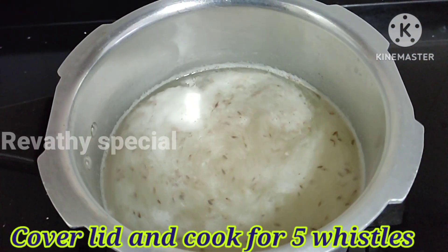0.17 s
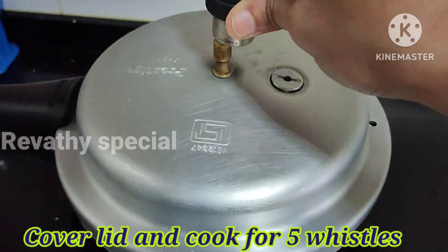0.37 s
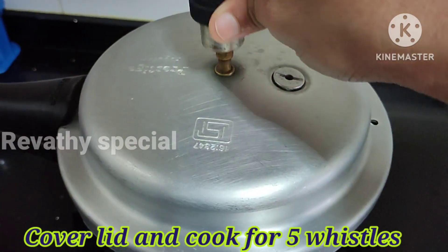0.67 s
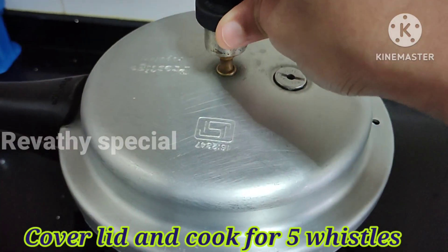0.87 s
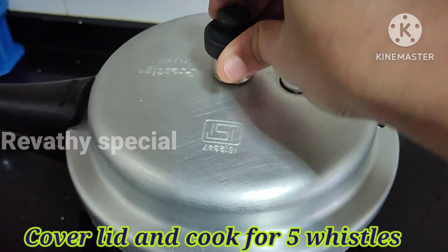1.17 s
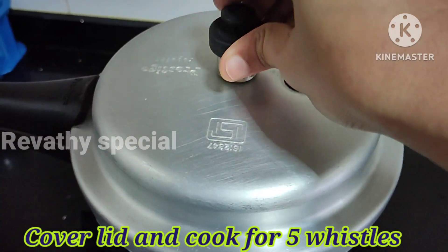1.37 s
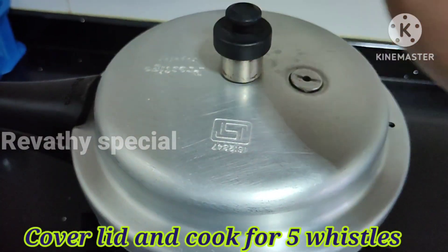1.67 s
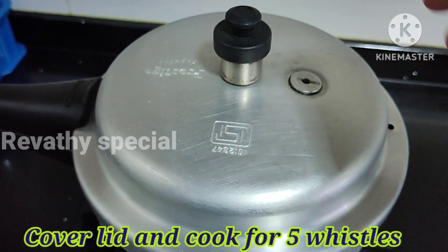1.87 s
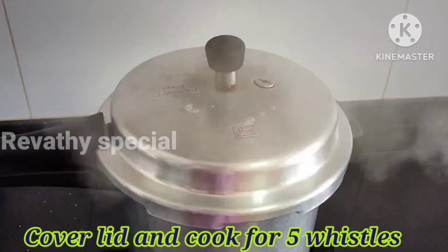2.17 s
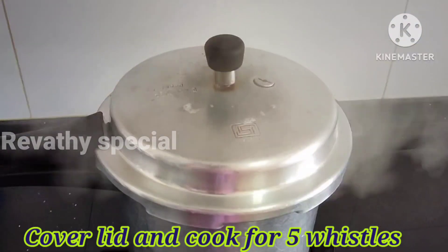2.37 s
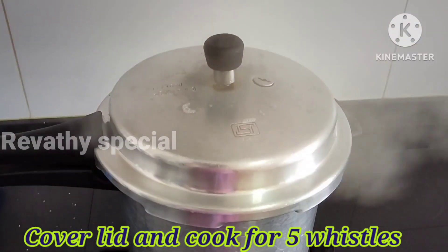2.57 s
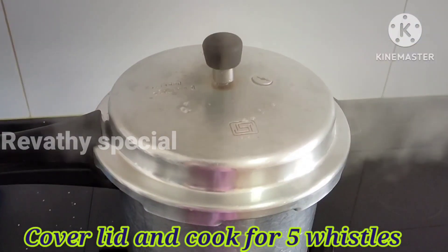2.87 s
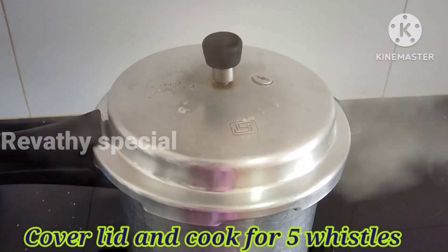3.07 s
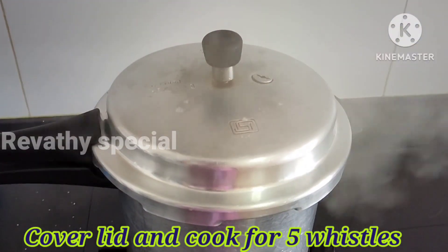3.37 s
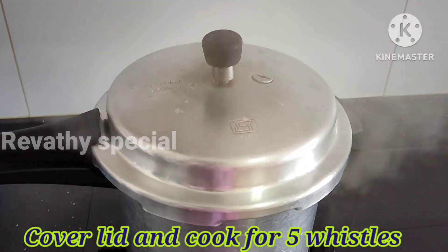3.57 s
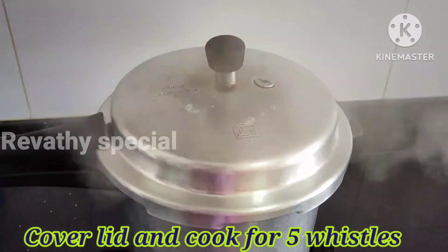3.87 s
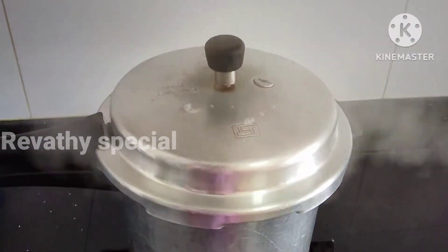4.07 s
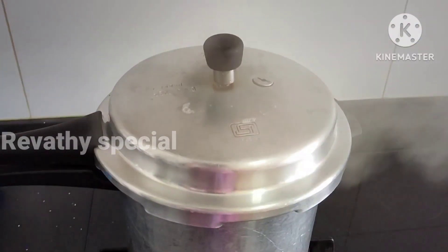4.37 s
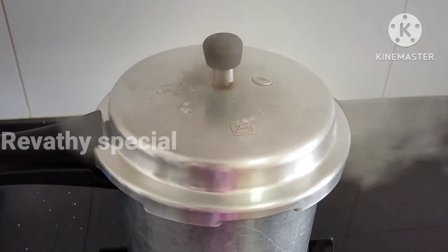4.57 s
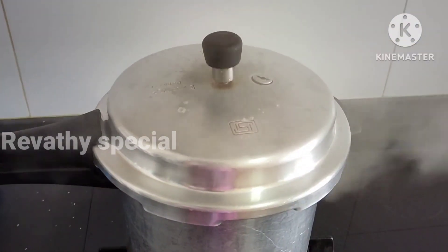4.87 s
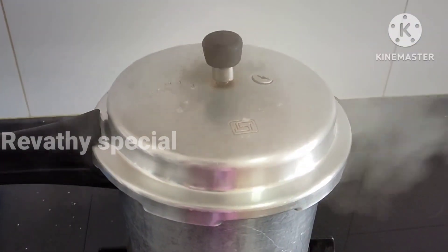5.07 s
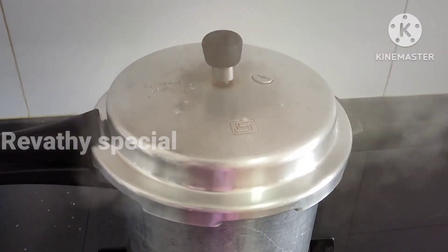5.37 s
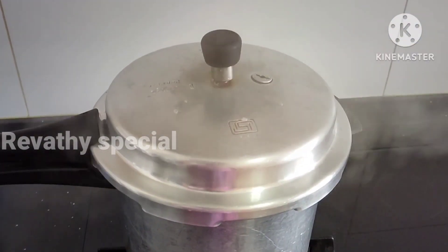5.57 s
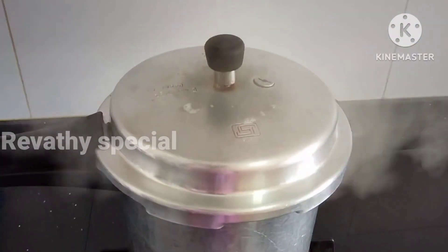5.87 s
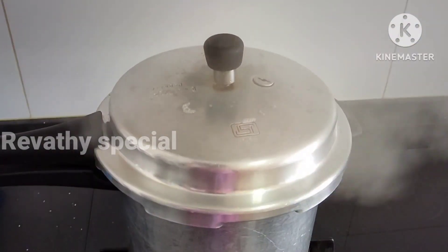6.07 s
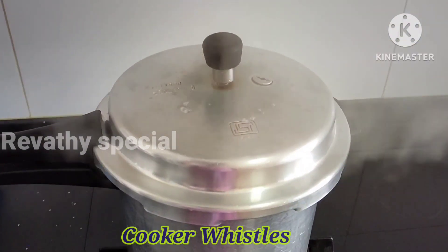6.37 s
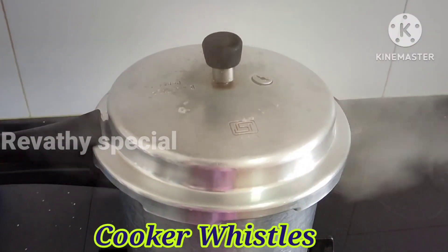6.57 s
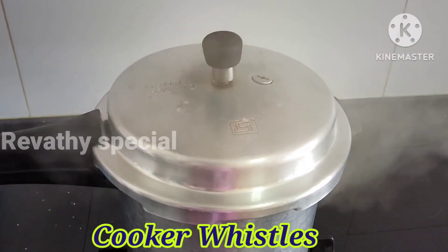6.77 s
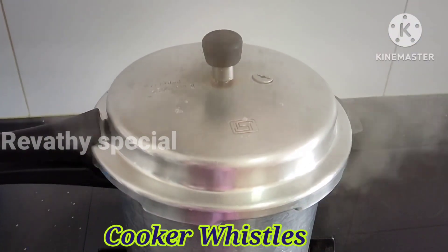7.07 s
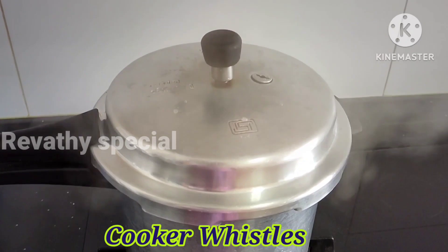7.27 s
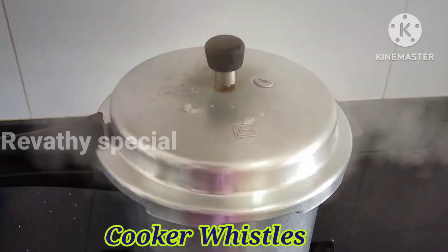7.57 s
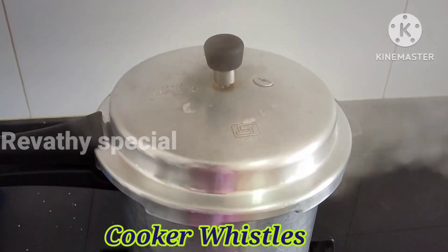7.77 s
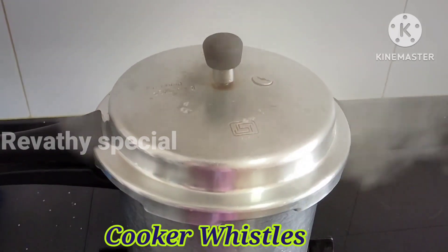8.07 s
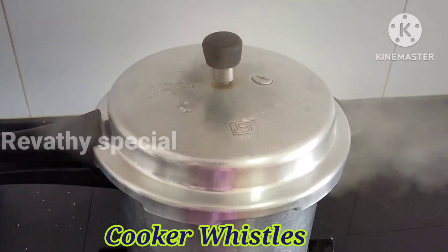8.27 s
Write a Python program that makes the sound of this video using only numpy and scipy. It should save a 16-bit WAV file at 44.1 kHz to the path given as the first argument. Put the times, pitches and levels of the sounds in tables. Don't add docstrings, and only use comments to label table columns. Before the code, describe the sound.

A faint metallic pot ring fades, a metal weight ticks, scrapes and snaps onto a lid, then roaring steam hisses in four repeated bursts.

```python
import sys
import numpy as np
from scipy import signal
from scipy.fft import irfft
from scipy.io import wavfile
from scipy.ndimage import uniform_filter1d

SR = 44100
rng = np.random.default_rng(int(sys.argv[2]) if len(sys.argv) > 2 else 0)


def store_pcm(level_fs):
    pcm = np.round(np.clip(level_fs, -1, 1) * 32767).astype(np.int16)
    wavfile.write(sys.argv[1], SR, np.atleast_2d(pcm).T)


def voltage_ratio(level):
    return 10 ** (np.asarray(level, float) / 20)


N = 371322

# frequency_hz, left_right_db
AIR_BALANCE = [(60, 2.5), (400, 2), (1200, 2.5), (2600, 13), (4000, 7), (5500, 13.5), (7200, 22.5),
               (8500, 5), (9500, -13.5), (14000, -2.5)]


def evened(x):
    return x / np.sqrt(np.mean(x ** 2) + 1e-20)


def read(points, hz):
    f, value = np.transpose(points)
    return np.interp(np.log(hz + 1), np.log(f + 1), value)


def ports(balance, hz):
    ratio = voltage_ratio(read(balance, hz)) ** 2
    return np.sqrt(2 * np.array([ratio, np.ones_like(ratio)]) / (1 + ratio))


def band(x, lo_hz, hi_hz):
    return signal.sosfilt(signal.butter(2, [lo_hz, hi_hz], "band", fs=SR, output="sos"), x)


def hiss(field_db, same, balance, size):
    hz = np.fft.rfftfreq(size, 1 / SR)
    a, b, c, d = rng.standard_normal(field_db.shape[::-1] + (4,)).T
    same = np.clip(same, -1, 1)[:, None]
    left = a + 1j * b
    early = np.exp(2j * np.pi * hz * 5 / SR)[:, None]
    right = same * left * early + np.sqrt(1 - same ** 2) * (c + 1j * d)
    z = np.array([left, right]) * voltage_ratio(field_db) * ports(balance, hz)[:, :, None]
    return signal.istft(z, nperseg=size, noverlap=size * 3 // 4)[1]


def kitchen(x, gap_s=0.0067):
    # frequency_hz, t60_s
    room_decay = [(200, 0.88), (1000, 0.64), (3000, 0.545), (8000, 0.71), (14000, .35)]
    echoes = np.zeros((2, SR))
    at = np.arange(200, SR - 20, 20) + rng.integers(0, 20, (2, (SR - 201) // 20))
    np.put_along_axis(echoes, at, rng.choice([-1., 1.], at.shape), 1)
    hz, t, z = signal.stft(echoes, SR, nperseg=256)
    z *= voltage_ratio(-60 * t / read(room_decay, hz)[:, None]) * (1 - np.exp(-t / gap_s))
    tail = signal.istft(z, SR, nperseg=256)[1]
    return signal.fftconvolve(x, tail / np.linalg.norm(tail[0]), axes=1)[:, :x.shape[1]]


def thinned(x, shares, depth_db=-50, edge_hz=15480):
    mid_side = np.array([x[0] + x[1], x[0] - x[1]]) / 2
    hz, t, z = signal.stft(mid_side, SR, "cosine", nperseg=2048, noverlap=1536)
    luck = rng.standard_normal((len(t) // 2 + 1, len(hz) // 10 + 1, 2))
    luck = uniform_filter1d(luck, size=2, axis=0)
    rank = np.array([v.ravel().argsort().argsort().reshape(v.shape) / v.size for v in luck.T])
    rank = rank.repeat(10, axis=1).repeat(2, axis=2)[:, :len(hz), :len(t)]
    share = read(shares, hz)[:, None]
    power = uniform_filter1d(abs(z) ** 2, size=24, axis=1)
    around = np.sqrt(uniform_filter1d(power, size=5, axis=2))
    emptied = (share + .03 * (hz[:, None] > 2500)) * [[[1.3]], [[1.15]]]
    kept = (rank > emptied) & (abs(z) > 1.9 * np.sqrt(share) * around)
    gain = np.where(kept, voltage_ratio(18.2 * share), voltage_ratio(depth_db))
    gain = gain / (1 + (hz[:, None] / edge_hz) ** 900)
    mid, side = signal.istft(z * gain, SR, "cosine", nperseg=2048, noverlap=1536)[1]
    return np.array([mid + side, mid - side])[:, :x.shape[1]]


def ring(modes, t, stretch, spread=.012):
    hz, db, t60 = np.transpose(modes)[:, :, None]
    shift, phase = rng.uniform(-0.93, 1, (2, len(modes), 1))
    decay = voltage_ratio(db - 60 * t / (t60 * stretch))
    wave = np.sin(2 * np.pi * hz * (1 + spread * shift) * t + np.pi * phase)
    return (decay * wave).sum(0)


def pot(t):
    # pitch_hz, level_db, t60_s
    pot_modes = [(2080, -49.5, 0.22), (2830, -56, 0.34), (4850, -53, .25), (5960, -50, .3),
                 (6040, -41.5, 0.23), (6870, -48, 0.38), (7400, -47, 0.4), (7640, -59, 0.45),
                 (8720, -64, .25), (9400, -50, 0.18)]
    wash = band(rng.standard_normal((2, len(t))), 1500, 11000) * voltage_ratio(-46.5 - 60 * t / 0.44)
    wash = wash - band(wash, 4250, 4750) - band(wash, 8000, 8700)
    left = ring(pot_modes, t, 1, spread=0.0018)
    right = 0.29 * ring(pot_modes, t, 0.54, spread=0.0017)
    modes = np.array([left, right])
    return modes + voltage_ratio(-10) * kitchen(modes) + wash


def room_air(n):
    # frequency_hz, level_db_per_hz
    air_colour = [(30, -35.5), (90, -5.5), (200, -11), (400, -2), (620, -9.5), (730, -12), (1000, -15.5),
                  (3100, -18), (3700, -30), (5500, -28.5), (7200, -22.5), (8100, -28), (8600, -39.5),
                  (12500, -43), (15600, -70)]
    # frequency_hz, likeness
    air_same = [(60, 0.55), (240, 0.74), (950, -0.13), (3770, 0.07), (15000, -0.06)]
    hz = np.fft.rfftfreq(1024, 1 / SR)
    patches = uniform_filter1d(rng.standard_normal((400, len(hz))).T, size=9, axis=0)
    patches = evened(uniform_filter1d(patches, size=12, axis=1))
    field_db = read(air_colour, hz)[:, None] + 1.9 * patches
    return evened(hiss(field_db, read(air_same, hz), AIR_BALANCE, size=1024)[:, :n])


def contact(t, db, treble_db, low_db, thud_db):
    # pitch_hz, level_db, t60_s
    lid = [(397, -8, 0.046), (589, -5.5, 0.036), (761, -1, 0.035), (970, -6.5, .06), (1415, -6, 0.077),
           (1635, -6.5, 0.045), (2020, -11, 0.055), (2290, -1, 0.058), (2516, -0.5, 0.067),
           (2785, -2, 0.076), (3110, 4, 0.05)]
    stretch = max(1.18 + 0.02 * (db + 45), .2)
    crack = rng.standard_normal(len(t)) * np.exp(-(t / (0.0066 * stretch)) ** 2)
    modes = [(hz, mode_db + (low_db + 11.5) * (hz < 1100), min(t60, 0.028 + 14 / hz))
             for hz, mode_db, t60 in [*lid, *lid]]
    body = 0.26 * ring(modes, t, stretch, spread=.035) * (1 - np.exp(-t / 0.00047))
    body = body + 1.2 * band(band(crack, 1700, 3300), 1200, 3400)
    tick = voltage_ratio(treble_db) * 1.98 * band(band(crack, 4400, 7800), 3500, 14000)
    push = np.sin(2 * np.pi * 300 * t) * t / 0.00085 * np.exp(-t / 0.0011)
    return voltage_ratio(db) * (body + tick + voltage_ratio(thud_db) * 3.18 * push)


def rub(t):
    # start_s, end_s, body_db, treble_db
    slide = (.915, .958, -42, -58)
    start, end, body_db, treble_db = slide
    along = np.clip((t - start) / (end - start), 0, 1) * (t < end)
    roughness = evened(uniform_filter1d(rng.standard_normal(len(t)), size=60))
    grit = rng.standard_normal(len(t)) * voltage_ratio(1.8 * roughness)
    body = band(grit, 650, 1050) * 1.6 + band(grit, 1500, 2400)
    body = body + band(band(grit, 2900, 3400), 2900, 3400) * 2.8
    treble = evened(band(grit, 5200, 7200))
    return np.sqrt(along) * voltage_ratio(body_db) * evened(body) + along ** 2 * voltage_ratio(treble_db) * treble


def weight():
    # start_s, peak_db, relative treble_db, lid_db
    taps = [
        (0.504, -28, -18, -14),
        (0.5124, -35.5, -16, 0),
        (1.0824, -59.5, -4, -11),
        (1.422, -45, -13.5, -12),
        (1.4367, -10, -9, -28),
        (1.4418, -16, -14, -18),
        (1.4455, -16, -14, -13),
        (1.719, -32, -20.5, -8.5),
    ]
    # start_s, peak_db
    slips = [(0.881, -52), (0.8912, -39.5), (0.9169, -44.5), (0.9245, -38.5), (0.9315, -43), (0.944, -46),
             (0.9523, -47.5), (0.969, -50.5), (0.98, -53.5)]
    # pitch_hz, level_db, t60_s
    stem = [(3047, -42, 0.16), (3064, -46.5, 0.32)]
    out = np.zeros(round(2.2 * SR))
    t = np.arange(16000) / SR
    # 1 dB under the lid level for taps, 12 dB under it for slips
    contacts = [(*row, row[-1] - 1) for row in taps]
    contacts += [(s, db, -29, -8, -8 - 12) for s, db in slips]
    for s, db, treble_db, low_db, thud_db in contacts:
        part = out[round(s * SR):][:len(t)]
        part += contact(t, db, treble_db, low_db, thud_db)[:len(part)]
    out[round(taps[0][0] * SR):][:len(t)] += ring(stem, t, 0.53, spread=0)
    return band(out + rub(np.arange(len(out)) / SR), 85, 18000)


def shot_fades(t):
    # start_s, cut_s, gain_db, drift_db_per_s
    shots = [
        (-.1, 0.3, 8, -22.5),
        (.447, 2.129, -2, 3),
    ]
    rise_s, fall_s, end_gain = 0.045, 0.12, .13
    gain = np.zeros(len(t))
    for start, cut, db, drift_db in shots:
        rise = np.clip((t - start) / rise_s, 0, 1) ** 2
        fall = np.clip(end_gain + (cut - t) / fall_s, 0, 1) * (t < cut)
        gain += rise * fall * voltage_ratio(db + drift_db * (t - start))
    return gain


def quiet_shots():
    # frequency_hz, share of emptied bands
    quiet_thin = [(3800, 0), (4500, .02), (5200, 0), (7900, .01), (8400, .36), (11000, .34), (15000, .4)]
    hits = weight()
    t = np.arange(len(hits)) / SR
    hz = np.fft.rfftfreq(1024, 1 / SR)
    colour = np.roll(irfft(ports(AIR_BALANCE, hz)), 32, axis=1)[:, :256]
    near = signal.oaconvolve(hits[None], colour, axes=1)[:, 32:32 + len(t)]
    near[1] = np.roll(near[1], -5)
    first = t < .4
    air_db = -64 + 2.0 + 5.5 * first
    far = voltage_ratio(-6.5) * kitchen(near) + voltage_ratio(air_db) * room_air(len(t)) + pot(t) * first
    return (near + thinned(far, quiet_thin)) * shot_fades(t)


def steam():
    # time_s, flow_db, opening_db (lifts upper hiss and roar)
    vent = [(2.3, 2, 0.5), (2.52, 1, -4.5), (2.62, -1, 2), (2.8, 0, 2), (2.97, 0, -1.5), (3.18, 1, -2),
            (3.26, 1, 0.5), (3.6, -1, 1.5), (3.77, 2, -3)]
    # frequency_hz, level_db_per_hz
    jet_colour = [(18, -69.5), (30, -44.5), (256, -15.5), (519, -17.5), (1230, -22.5), (1770, -18.5),
                  (2630, -9), (3070, -12), (3790, -11.5), (4310, -12), (5600, -10.5), (7280, 0),
                  (8080, -5.5), (9210, -3), (15500, -19)]
    # frequency_hz, left_right_db
    jet_balance = [(60, -6), (250, -11.5), (600, -11), (1200, -8), (2400, 2.5), (4000, 0), (6000, 4.5),
                   (7300, 8), (8000, 0), (8600, -4.5), (9300, -13.5), (10500, -17), (12500, -1),
                   (15000, -7)]
    # frequency_hz, width_hz, level_db
    notches = [(5610, 30, -2.5), (6105, 37, -14), (8090, 550, -6), (11010, 240, -7.5), (13770, 100, 1)]
    # frequency_hz, share of emptied bands
    jet_thin = [(1500, 0), (2600, .05), (3150, .4), (3700, .28), (4250, .42), (4900, .28), (5750, .42),
                (6500, .06), (7400, .02), (8100, .2), (8700, .04), (9500, .03), (11000, .12), (13200, .16),
                (14200, .36), (15400, .36)]
    s, flow_db, open_db = np.transpose(vent)
    hz = np.fft.rfftfreq(512, 1 / SR)[:, None]
    t = 2.2 + np.arange(620) * 128 / SR
    upper = 1 / (1 + (8300 / (hz + 1)) ** 12)
    roar = 1 / (1 + (hz / 4500) ** 6)
    patches = uniform_filter1d(rng.standard_normal((len(t), len(hz))).T, size=6, axis=0)
    patches = evened(uniform_filter1d(patches, size=14, axis=1))
    sputter = evened(uniform_filter1d(rng.standard_normal(len(t)), size=3))
    walls_db = sum(db / (1 + (2 * (hz - f) / w) ** 2) for f, w, db in notches)
    field_db = read(jet_colour, hz) + walls_db + (upper + 0.63 * roar) * np.interp(t, s, open_db)
    field_db = field_db + 1.52 * patches + 0.62 * sputter * (1 - roar)
    jet = evened(hiss(field_db, 0.37 + 0 * hz[:, 0], jet_balance, size=512))
    jet = evened(thinned(jet + voltage_ratio(-7.0) * kitchen(jet), jet_thin))
    t = 2.2 + np.arange(jet.shape[1]) / SR
    return t, jet * voltage_ratio(-16.5 + np.interp(t, s, flow_db))


def pop(t):
    # peak_db, push_s, left_right_db
    droplet = (-8.5, 0.00067, -3.5)
    db, length, pan_db = droplet
    start_s = 2.4412 + np.array([[0], [.0003]])
    u = np.maximum(t - start_s, 0) / length
    push = np.sin(2.1 * u ** .75) * np.exp(-.7 * u) * (1 - np.exp(-u / .1))
    return voltage_ratio(db) * 1.77 * band(push, 35, 5000) * voltage_ratio([[pan_db], [0]])


def scene():
    # shift_samples, fade_in_s, fade_out_s, cut_s
    repeats = [
        (0, 2.257, 3.815, 3.878),
        (76800, 2.2625, 3.83, 3.9025),
        (154624, 2.262, 3.822, 3.882),
        (231424, 2.257, 3.82, 3.9),
    ]
    ducks_db = [-13.5, -24, -22, -23]
    rise_s, rise_bend, fall_s = 0.26, 0.85, 0.056
    out = np.zeros((2, N + 2 * SR))
    quiet = quiet_shots()
    out[:, :quiet.shape[1]] += quiet
    t, jet = steam()
    burst = pop(t)
    for (shift, begin, duck, cut), duck_db in zip(repeats, ducks_db):
        rise = np.clip((t - begin) / rise_s, 0, 1) ** rise_bend
        ducked = 1 - np.exp(-np.maximum(t - duck, 0) / fall_s)
        fall = voltage_ratio(duck_db * ducked) * (t < cut)
        start = quiet.shape[1] + shift
        out[:, start:start + len(t)] += jet * rise * fall + burst
    return out[:, :N]


def roll_off(x):
    return signal.sosfilt(signal.butter(12, 15690, fs=SR, output="sos"), x)


def record(dry):
    cut = signal.sosfilt(signal.butter(2, 84, "high", fs=SR, output="sos"), dry)
    audible = uniform_filter1d(abs(dry).max(0), size=64) > 3e-6
    return roll_off(cut * audible)


dry = scene()
out = record(dry)
store_pcm(out)
```